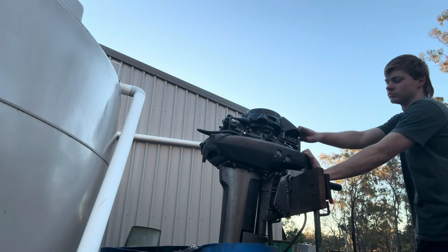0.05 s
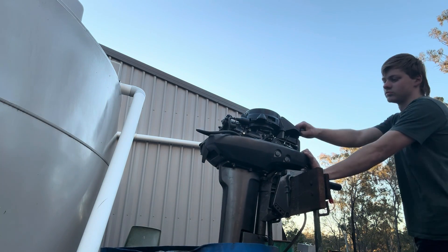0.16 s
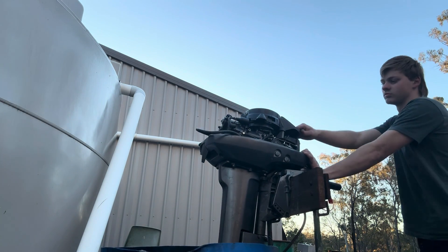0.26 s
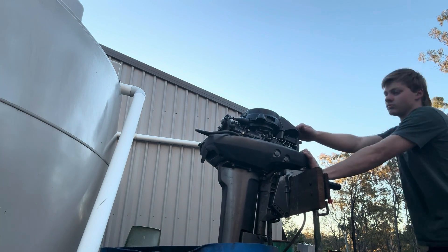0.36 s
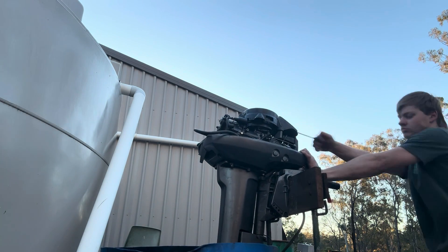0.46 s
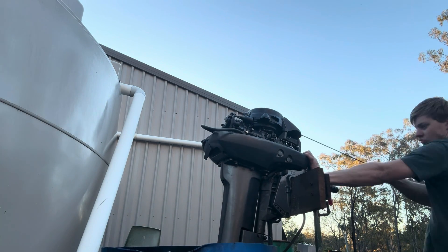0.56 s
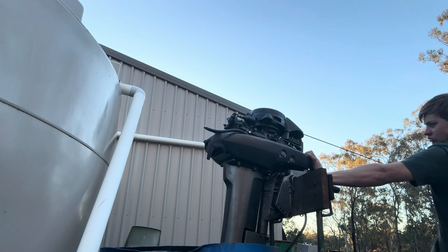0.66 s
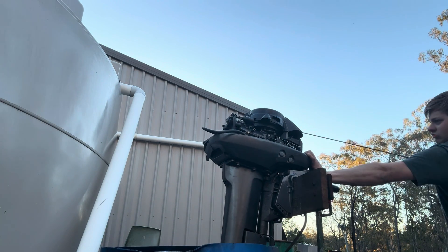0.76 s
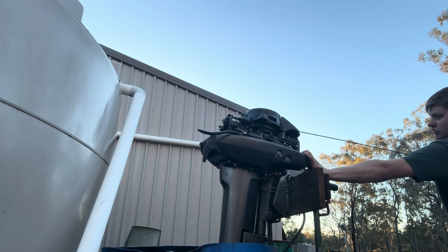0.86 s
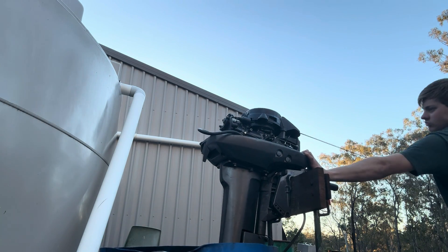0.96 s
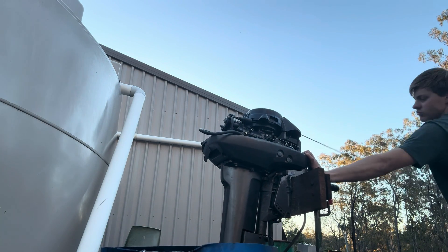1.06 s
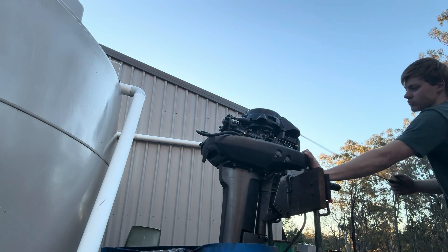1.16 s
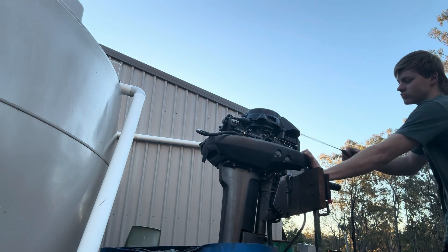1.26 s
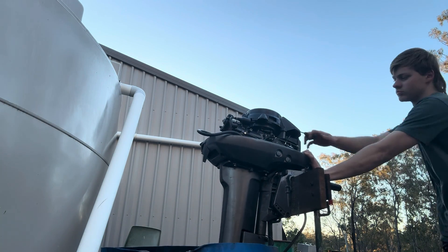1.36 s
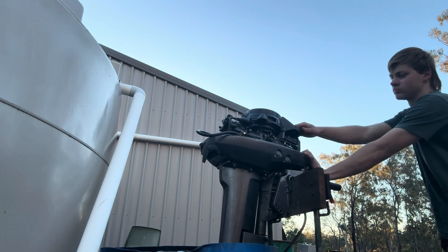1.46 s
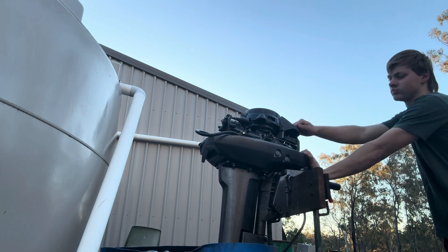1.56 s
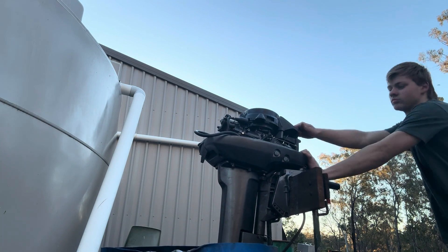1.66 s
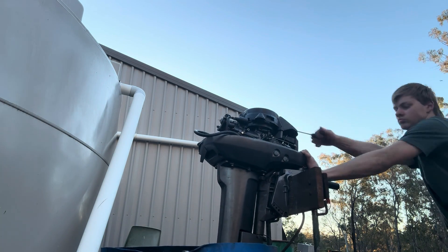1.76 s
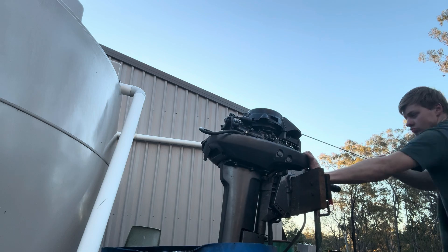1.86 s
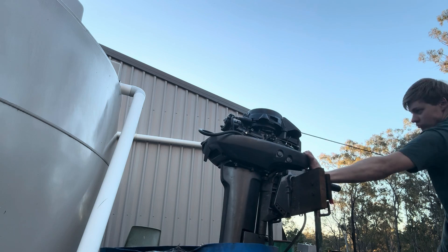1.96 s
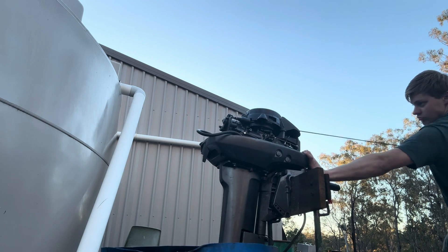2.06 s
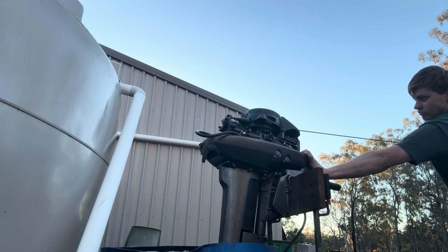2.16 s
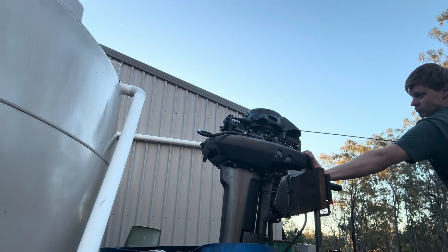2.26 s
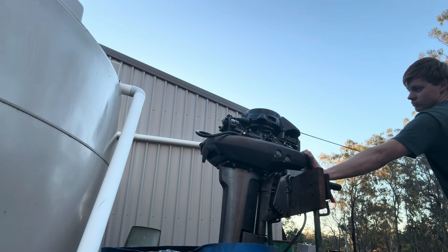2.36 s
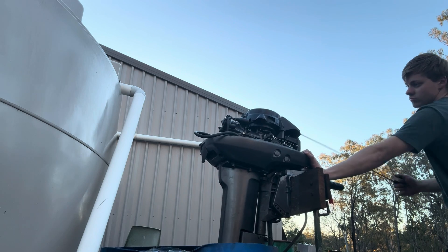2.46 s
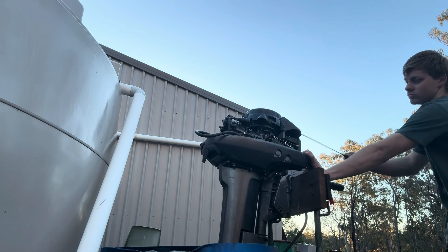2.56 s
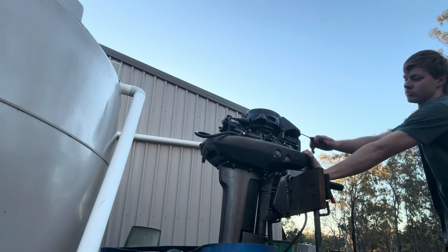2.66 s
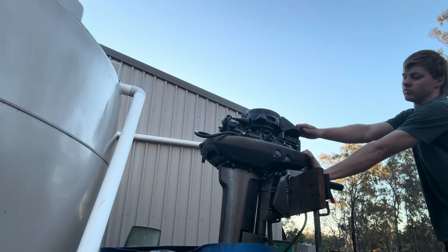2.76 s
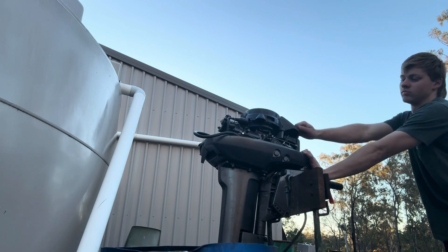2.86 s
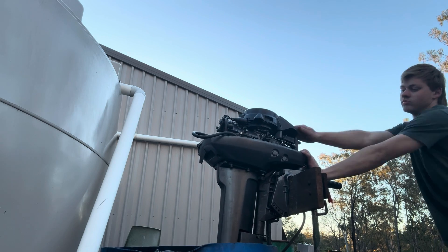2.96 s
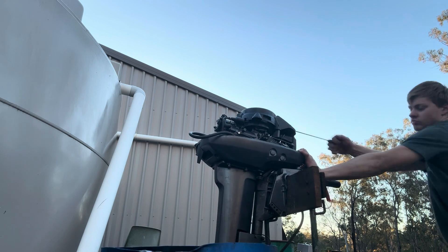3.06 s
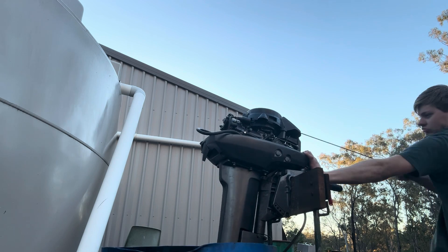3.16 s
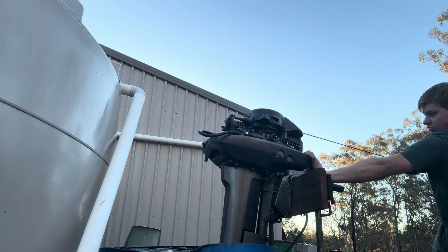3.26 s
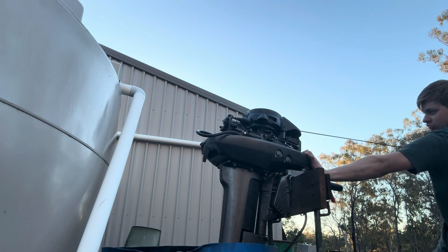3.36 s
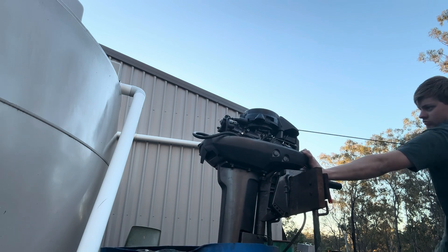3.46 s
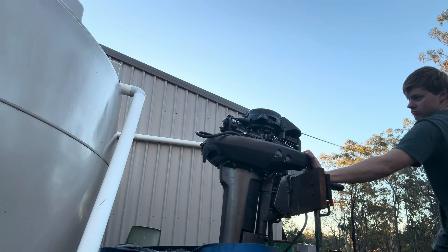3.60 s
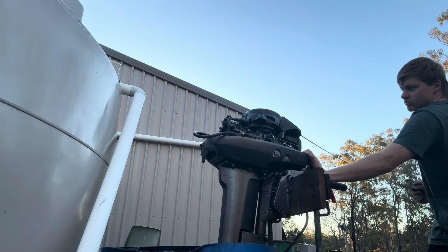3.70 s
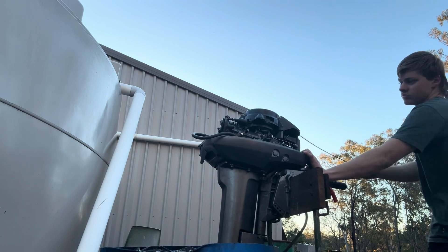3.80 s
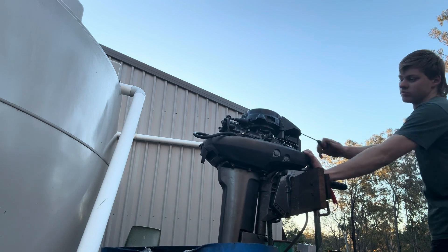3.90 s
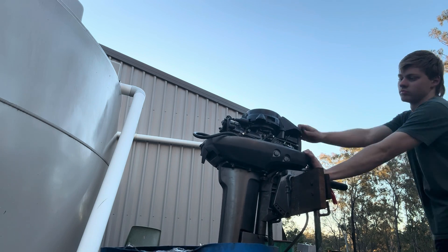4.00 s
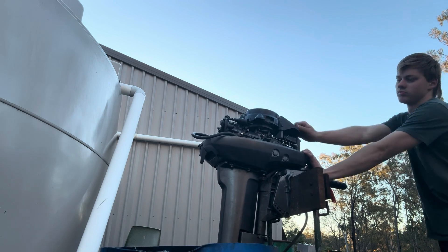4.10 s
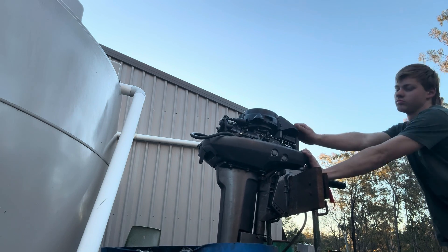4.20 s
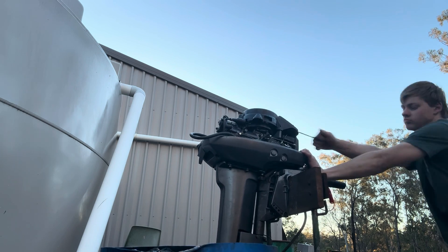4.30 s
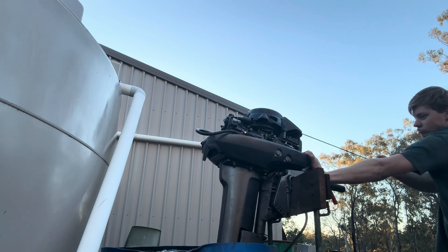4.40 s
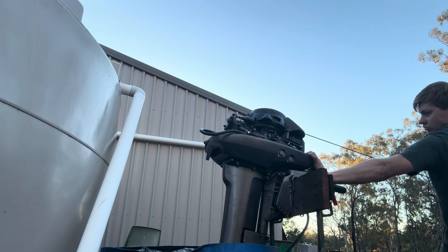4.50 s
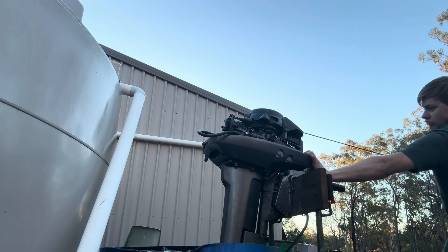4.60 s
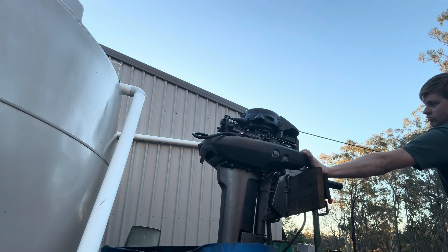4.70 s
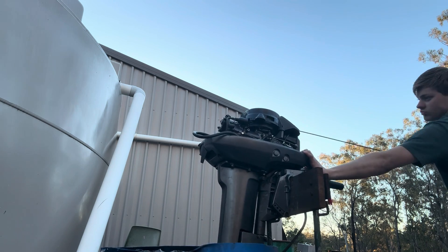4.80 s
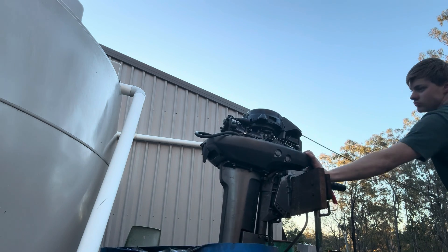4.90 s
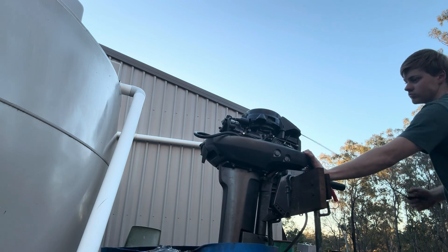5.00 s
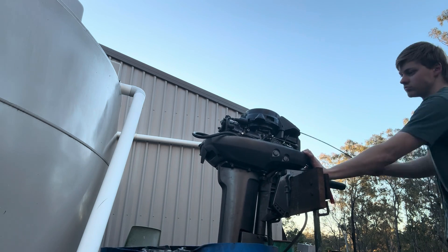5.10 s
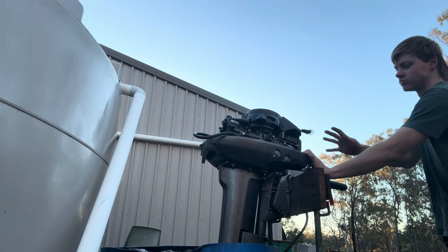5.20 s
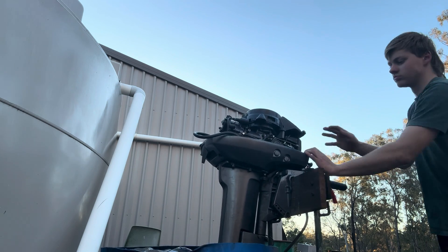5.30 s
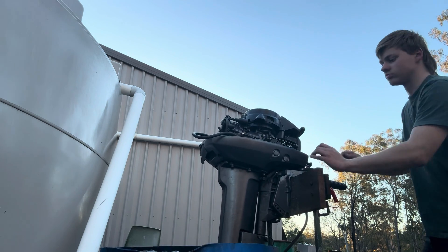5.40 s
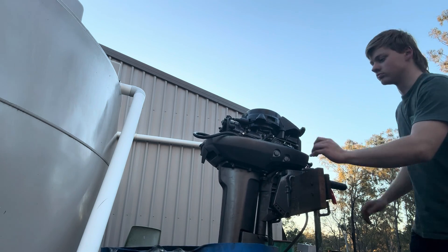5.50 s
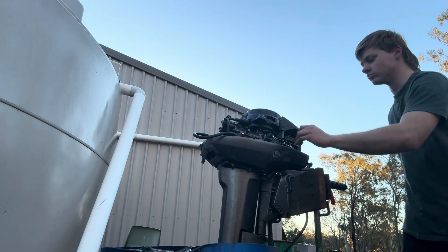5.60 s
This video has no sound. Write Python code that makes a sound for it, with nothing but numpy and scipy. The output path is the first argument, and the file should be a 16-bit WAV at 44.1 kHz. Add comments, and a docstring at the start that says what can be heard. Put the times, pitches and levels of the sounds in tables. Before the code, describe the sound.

An outboard motor is pulled over four times by its starter rope and never fires, heard nearby in a quiet yard with a short echo off a shed wall. The pulls begin at about 0.5, 1.7, 3.1 and 4.3 seconds, each with a small scrape and a sharp clack as the starter bites. The rope whirs out with a brief rising zing and a dense rattle, while the engine turns over in about a dozen rapid, honking pulses with low exhaust thumps and hisses, slowing to a stop after roughly 0.6 seconds. The rope then rattles more softly back onto its pulley. Faint, thin spring squeaks come between pulls, around 0.9 to 1.7, 2.5 to 3 and 4 seconds. Near 4.9 seconds a knock makes the housing hum briefly, and at 5.2 seconds the handle knocks home, followed by a couple of faint clicks.

```python
"""Outboard that will not start

A two-cylinder outboard on a stand in a yard is pulled over four times by its rope and does not catch.
The pawl knocks in; each crank half-turn honks a reed valve, thumps the exhaust leg and hisses at the
ports. The rope whirs out and rattles back onto its pulley, the rewind spring squeaks between pulls,
a shed wall echoes."""
import sys
import numpy as np
from scipy import signal
from scipy.fft import rfft, irfft, next_fast_len
from scipy.io import wavfile
from scipy.ndimage import uniform_filter1d

SR = 44100
rng = np.random.default_rng(int(sys.argv[2]) if len(sys.argv) > 2 else 0)


def inscribe(sig):
    """Save sig as 16-bit PCM at rate SR to the path in sys.argv[1].

    A 1-D sig is mono; a 2-D sig holds one channel per row.
    Samples are clipped to [-1, 1] before scaling.
    """
    pcm = np.round(np.clip(np.atleast_2d(sig).T, -1, 1) * 32767)
    wavfile.write(sys.argv[1], SR, pcm.astype(np.int16))


N = 249165
t = np.arange(N) / SR


def undb(db):
    return 10 ** (np.asarray(db) / 20)


def unit(x):
    return x / np.sqrt(np.mean(x ** 2))


def ring(x, modes):
    """Parallel resonators of alternating sign; modes: f/Hz, width/Hz, gain/dB."""
    return sum((-1) ** k * undb(db) * signal.lfilter(*signal.iirpeak(hz, hz / width, SR), x)
               for k, (hz, width, db) in enumerate(modes))


def colour(spectrum, x=None):
    """White noise, or x, shaped by a spectrum (f/Hz, gain/dB); rms 1."""
    x = rng.standard_normal(N) if x is None else x
    hz, db = np.transpose(spectrum)
    size = next_fast_len(N)
    bin_hz = np.arange(size // 2 + 1) * SR / size
    gain = undb(np.interp(np.log(bin_hz + 1), np.log(hz), db, left=-90))
    return unit(irfft(rfft(x, size) * gain, size)[:N])


def walk(rate_hz):
    """Smoothed random steps; rms 1."""
    hold = max(int(SR / rate_hz), 2)
    steps = np.repeat(rng.standard_normal(N // hold + 1), hold)
    return unit(uniform_filter1d(uniform_filter1d(steps, hold), hold)[:N])


def bumps(at_s, db, rise_s, fall_s, edge=2):
    """Envelope of asymmetric swells; a larger edge flattens the top."""
    out = np.zeros(N)
    for at, gain, rise, fall in np.broadcast(at_s, undb(db), rise_s, fall_s):
        near = slice(max(int((at - 4 * rise) * SR), 0), int((at + 4 * fall) * SR))
        u = t[near] - at
        out[near] += gain * np.exp(-.5 * np.abs(u / np.where(u < 0, rise, fall)) ** edge)
    return out


def tones(rows, waver, flicker_db, rasp):
    """Gliding, wavering, rough sines that swell in and out."""
    out = np.zeros(N)
    for start, end, from_hz, to_hz, db in rows:
        fade = np.sin(np.pi * np.clip((t - start) / (end - start), 0, 1)) ** .5
        pitch_hz = np.interp(t, [start, end], [from_hz, to_hz]) * (1 + waver * walk(90))
        wave = np.sqrt(2) * np.sin(2 * np.pi * np.cumsum(pitch_hz) / SR)
        out += wave * fade * undb(db + flicker_db * walk(40)) * (1 + rasp * walk(300))
    return out


def place(x, pan_db, wall_db, t60_s=.098, left_lag_s=88e-6):
    """Pan (+ is left), left side delayed; shed and tank return a separate short echo to each side."""
    u = np.arange(int(.3 * SR)) / SR
    echo = rng.standard_normal((2, len(u))) * np.exp(-np.log(1000) * u / t60_s) * (u > .003)
    echo = signal.sosfilt(signal.butter(1, [150, 12000], "band", fs=SR, output="sos"), echo)
    echo /= np.sqrt(np.sum(echo ** 2, 1, keepdims=True))
    wet = signal.fftconvolve(x[None], echo, axes=1)[:, :N]
    size = next_fast_len(N)
    bin_hz = np.arange(size // 2 + 1) * SR / size
    late = irfft(rfft(x, size) * np.exp(-2j * np.pi * bin_hz * left_lag_s), size)[:N]
    return np.array([late * undb(pan_db / 2), x * undb(-pan_db / 2)]) + undb(wall_db) * wet


def yard():
    """Faint low outdoor noise, mostly common to both sides."""
    spectrum = [(20, -15.5), (40, 3), (120, 3), (270, -7.5), (700, -10.5), (2500, -14), (5000, -26.5),
                (12000, -27.5), (16000, -48)]  # f/Hz, level/dB
    common = colour(spectrum)
    sides = np.array([colour(spectrum), colour(spectrum)])
    return undb(-68.5) * (common + .33 * sides)


def spring():
    """Thin, intermittent squeak of the rewind spring."""
    squeaks = [(.11, .15, 4220, 4150, -59), (.19, .26, 4280, 4230, -58.5), (.925, 1.01, 3880, 3800, -48),
               (1.12, 1.32, 3810, 3680, -52), (1.36, 1.42, 3700, 3680, -49),
               (1.45, 1.535, 3650, 3480, -51.5), (1.55, 1.615, 3480, 3520, -51),
               (1.635, 1.7, 3590, 3480, -52), (2.5, 2.8, 2880, 2740, -58), (2.845, 2.99, 2800, 2660, -60),
               (3.89, 3.93, 4000, 4000, -55), (3.97, 4.095, 3910, 3925, -44.5),
               (4.2, 4.29, 3940, 3860, -49)]  # start/s, end/s, from/Hz, to/Hz, level/dB
    return tones(squeaks, waver=.004, flicker_db=3, rasp=.35)


def rope():
    """Rope sings over its guide: rising on the pull, falling on the rewind."""
    glides = [(.54, .64, 1200, 1400, -28.5), (1.19, 1.29, 1437, 1300, -46), (1.3, 1.375, 1062, 941, -51),
              (1.8, 1.9, 1055, 1400, -34), (3.17, 3.28, 1230, 1320, -28.5), (3.84, 3.89, 1400, 1330, -48),
              (4.43, 4.525, 1253, 1350, -28), (5.1, 5.16, 1400, 1340, -45)]  # start/s, end/s, from/Hz, to/Hz, level/dB
    return tones(glides, waver=.025, flicker_db=3, rasp=.7)


def housing_hum():
    """The housing hums briefly after one knock."""
    hum = [(4.925, 4.975, 589.5, 568, -20.5)]  # start/s, end/s, from/Hz, to/Hz, level/dB
    return tones(hum, waver=.01, flicker_db=6, rasp=.15)


def pull_gains():
    """Rattle, rumble, whir and air gains: one out-and-back course, stretched to each pull."""
    pulls = [(-.88, .1), (.457, 1.46), (1.716, 2.8), (3.061, 4.07), (4.33, 5.38)]  # pawl bites/s, rope home/s; the first is only a tail
    spin_db = [(-24.5, -24.5, -50, -53.5), (-29, -26, -52, -53.5), (-29.5, -26, -62, -55.5),
               (-29.5, -25.5, -52, -57.5), (-28, -26.5, -52, -57.5)]  # full spin, per pull: rattle/dB, rumble/dB, whir/dB, air/dB
    course = [(-.02, -59.5, -57.5, -17, -32.5), (.04, -4, -14.5, -7.5, -2.5), (.13, -3.5, -3, -4.5, -0.3),
              (0.282, 0.8, 0.3, -4.5, -2.5), (.45, -6.5, -12.5, -8.5, 2.6), (.62, -10.5, -4.5, -7, -8.5),
              (.72, -8.5, -11, -6, -29), (.85, -17.5, -20.5, -11, -30), (.96, -22, -25.5, -1, -24.5),
              (1.03, -40.5, -39.5, -13.5, -25.5), (1.3, -56.5, -52, -20.5, -32)]  # share of pull, then re full spin: rattle/dB, rumble/dB, whir/dB, air/dB
    share, *course_db = np.transpose(course)
    gains = np.zeros((4, N))
    for (bite_s, home_s), full_db in zip(pulls, spin_db):
        progress = (t - bite_s) / (home_s - bite_s)
        for gain, full, db in zip(gains, full_db, course_db):
            gain += undb(full + np.interp(progress, share, db, left=-99, right=-99))
    return gains


def pulley():
    """Dense uneven ticks of rope, spring and pawl ring the housing; rope whir and flywheel air above."""
    modes = [(451.4, 28, 16), (624, 86, 12.5), (961, 110, 18), (1303, 64, 11.5), (1490, 20, -2.5),
             (1706, 100, 0.5), (2060, 27, -29.5), (2630, 30, -28), (3420, 570, -14)]  # housing: f/Hz, width/Hz, gain/dB
    scrapes = [(0.411, 0.46, -40.5), (1.684, 1.694, -53), (3.011, 3.06, -37.5), (4.289, 4.327, -36)]  # slack taken up, pawl scraping out: start/s, end/s, level/dB
    whir_spectrum = [(1800, -2), (2500, -7), (3500, -7.5), (5000, -10), (7000, -16.5), (9000, -43.5)]  # rope: f/Hz, level/dB
    air_spectrum = [(5000, -12.5), (7000, -34.5), (10000, -5.5), (14000, 13), (15500, -7), (16500, -26)]  # flywheel: f/Hz, level/dB
    rattle, rumble, whirring, wind = pull_gains()
    start, end, slack_db = np.transpose(scrapes)
    half_s = (end - start) / 2
    slack = bumps(start + half_s, slack_db, half_s, half_s, edge=2.7)
    ticks = rng.standard_normal(N) * undb(np.minimum(3 * rng.exponential(size=N), 17))

    def flicker(db):
        return undb(db * walk(70))

    shaken = ticks * flicker(2.2)
    # the contact wanders over the housing, so each mode also flickers alone
    upper = unit(sum(ring(shaken * flicker(3.4), [mode]) for mode in [*modes[2:], (1400, 1500, -22)]))
    lower = unit(sum(ring(shaken * flicker(3.64), [mode]) for mode in [(300, 80, -4), *modes[:2]]))
    whir = colour(whir_spectrum, shaken) * flicker(.83)
    air = colour(air_spectrum, ticks) * flicker(2)
    housing = upper * (rattle + slack) + lower * (rumble + 1.2 * slack)
    return housing + whir * (whirring + .5 * slack) + air * wind


def knocks(bounce_s=.011, push_s=.0011):
    """Pawl, handle and housing knocks: a blow, a bounce and a buzz ring the housing; a crack on top."""
    hits = [(0.041, -31.5, -34, -40, 0.48), (0.414, -24, -38, -20, 1), (0.457, -1.5, -13, -10.5, 0.45),
            (0.778, -10, -18.5, -42.5, 0.55), (1.692, -32, -48.5, -34, 0.68),
            (1.716, -3.5, -11.5, -11, 0.23), (2.767, -37, -40, -67.5, 0.96), (2.781, -41, -48, -68.5, 1),
            (3.008, -33, -53.5, -29, 0.93), (3.061, -3, -14, -11, 0.54), (4.009, -27.5, -36, -55.5, 0.54),
            (4.083, -38, -67, -70, 0.3), (4.187, -39.5, -50, -49, 0.86), (4.286, -24, -39, -25, .6),
            (4.33, -2.5, -14, -10.5, 0.81), (4.916, -16.5, -17, -23.5, 1), (5.235, -7.5, -13, -15.5, 1),
            (5.286, -19, -28, -41, 1), (5.423, -41, -47, -40.5, 0.59), (5.532, -61, -56.5, -31.5, 0.32)]  # t/s, high ring/dB, low ring/dB, crack/dB, decay scale
    low_modes = [(310, 80, -2), (465, 80, -3), (615, 120, 0)]  # housing: f/Hz, width/Hz, gain/dB
    high_modes = [(960, 100, -7), (1300, 170, 0), (1830, 120, -12), (2330, 150, -22)]  # housing: f/Hz, width/Hz, gain/dB
    at_s, high_db, low_db, crack_db, decay = np.transpose(hits)

    def buzz(db, tail_db, bounce_db):
        push = bumps(at_s + .0024, db, push_s, push_s * decay)
        bounce = bumps(at_s + bounce_s, db + bounce_db, push_s, 2 * push_s)
        tail = bumps(at_s + .0013, db + tail_db, .0047, .016 * decay)
        return rng.standard_normal(N) * (push + bounce + tail)

    def blow(db, lag_s):
        out = np.zeros(N)
        out[((at_s + lag_s) * SR).astype(int)] = undb(db)
        return out

    high = ring(blow(high_db + 35, .0025) + buzz(high_db + 6, -10.5, -18), high_modes)
    low = ring(blow(low_db + 39.5, .004) + buzz(low_db + 15.5, -10.5, 0), low_modes)
    snap = buzz(crack_db, -20, -27.5)
    ping = ring(snap, [(2800, 47, 14.3), (3450, 49, 9.3)])  # steel of the pawl
    crack = colour([(2000, 0), (2600, -4.5), (4500, 2), (6500, -3), (9000, -14.5), (14000, -12.5),
                    (16500, -12.5)], snap + ping)
    return high + low + crack * undb(-39.5)


def strokes():
    """Half-turn columns, cylinder, duration/s. Cylinder indexes setting pairs: 0 stiff reed, 1 soft."""
    # crank half-turns per pull: t/s, reed f/Hz, reed octave/dB, puff/dB, port lag/ms, hiss/dB, chirp/dB
    pulls = [
        [(.505, 357, -43.5, -40, -0.5, -29.5, -56), (.561, 329.6, -16.5, -32.5, 7, -49, -58),
         (.611, 357, -23.5, -23.5, -7.5, -25.5, -44.5), (.652, 328, -11.5, -32, -3.5, -44, -49),
         (.689, 355.5, -20, -22.5, -10, -25, -47.5), (.725, 324, -10, -45.5, 0, -41, -62),
         (.757, 338, -19, -21.5, -0.5, -26, -43), (.804, 328.2, -11, -33.5, -8, -29.5, -43),
         (.845, 357, -21, -24, -5.5, -24, -45), (.893, 326, -11.5, -46.5, 18.5, -46, -59.5),
         (.948, 358, -20, -22, -3.5, -27, -39.5), (1.01, 339, -14, -41.5, 15, -47.5, -61),
         (1.088, 359.5, -22, -25, 9.5, -38, -60)],
        [(1.812, 364.6, -23, -28, 1.5, -27, -42.5), (1.864, 327, -16.5, -38, 2, -57, -59),
         (1.91, 362, -20.5, -21.5, -6.5, -26.5, -34), (1.949, 331, -13, -46.5, 1, -51, -59),
         (1.99, 358, -21.5, -23, -8.5, -26.5, -30.5), (2.026, 326, -13.5, -45.5, 1.5, -55.5, -60),
         (2.061, 353, -18, -21.5, -4, -25, -30.5), (2.106, 326, -15, -34.5, -4, -43, -52.5),
         (2.151, 356.8, -20.5, -21.5, -5.5, -25.5, -37), (2.199, 327, -13, -48, 25, -40.5, -73),
         (2.256, 361, -21.5, -23.5, 5, -29.5, -53.5), (2.324, 346.5, -18, -38, 2, -56.5, -64.5),
         (2.407, 358, -23, -27.5, -5, -45.5, -61)],
        [(3.144, 360.4, -22, -25.5, -1, -28.5, -43), (3.193, 326, -15.5, -38.5, -1, -55, -58.5),
         (3.249, 354.5, -24.5, -23, -10.5, -27, -50.5), (3.283, 329.4, -10.5, -35.5, 2, -45.5, -52),
         (3.321, 351, -19.5, -22.5, 1.5, -25, -37.5), (3.364, 331.3, -12.5, -36, 1.5, -41.5, -51),
         (3.409, 354, -19, -22.5, -3.5, -25, -49), (3.457, 333, -13, -32.5, 5, -54, -48),
         (3.511, 358.7, -20, -23.5, -6.5, -30, -44.5), (3.568, 342, -17, -44, -3, -54, -67),
         (3.646, 362, -20, -25.5, -13.5, -38, -44)],
        [(4.411, 358.7, -21.5, -26, 1.5, -34, -52), (4.462, 328.6, -16.5, -35.5, .1, -55, -57),
         (4.51, 363.6, -22, -24.5, -6, -26, -43), (4.543, 330, -14, -38.5, 6, -47, -52.5),
         (4.585, 345, -23, -24, -3.7, -30.5, -52), (4.629, 329.5, -14, -36, -4, -46.5, -55),
         (4.669, 356, -20.5, -22, -2, -28, -36), (4.713, 329, -13.5, -43, 1, -39.5, -47),
         (4.765, 355, -20, -22.5, -11, -31.5, -47), (4.819, 331.5, -15, -39, .1, -52, -65),
         (4.884, 359, -21, -24.5, -7, -36, -41), (4.986, 354, -24.5, -42, .1, -62, -65)],
    ]
    cylinder = np.concatenate([np.arange(len(pull)) % 2 for pull in pulls])
    turn_s = np.concatenate([np.gradient(np.array(pull)[:, 0]) for pull in pulls])
    return (*np.concatenate(pulls).T, cylinder, turn_s)


def ports(hiss_share=(.14, .2), spit_length_s=.0055):
    """A port opens with a spit of air; the hiss peaks just after and chirps at the port edge."""
    spits = [(.958, -35), (1.078, -41), (1.214, -51), (1.35, -54), (3.109, -39), (3.807, -39.5),
             (4.386, -36), (4.63, -53), (5.09, -40.5)]  # extra lone spits: t/s, level/dB
    hiss_spectrum = [(1470, -34.5), (2500, -13), (3020, -24.5), (5330, 6.5), (7370, -29), (10400, -4),
                     (12000, -9.5), (13800, 3.5), (15500, -3), (16500, -31)]  # f/Hz, level/dB
    stroke_s, _, _, _, lag_ms, hiss_db, edge_db, cylinder, turn_s = strokes()
    spit_s, spit_db = np.transpose(spits)
    at_s = np.r_[stroke_s + lag_ms / 1000, spit_s]
    air_db = np.r_[hiss_db, spit_db]
    chirp_db = np.r_[edge_db, spit_db - 16.5]
    length_s = np.r_[np.take(hiss_share, cylinder) * turn_s, np.full(len(spits), spit_length_s)]
    gust = undb(2 * walk(400))
    hiss = colour(hiss_spectrum) * bumps(at_s, air_db, .3 * length_s, .5 * length_s)
    spit = colour([(1500, -8.5), (3000, -1.5), (6000, -.5), (9000, -.5), (14000, -8), (16500, -29.5)])
    spit *= bumps(at_s - .008, air_db - 3.5, .0004, .0024)
    edge = ring(ring(rng.standard_normal(N), [(5900, 710, 0)]), [(5300, 550, 0)])
    chirp = unit(edge) * bumps(at_s + .002, chirp_db + 5, .003, .004)
    return (hiss + spit) * gust + chirp


def exhaust(puff_hz=(108, 82), lag_share=(.14, .21), rise_s=.0059, fall_s=.0048, sag_per_s=4.8):
    """A puff rings the long leg, its pitch sagging; turbulence shakes it and rumbles after."""
    puffs, shake_rad = np.zeros(N), .3 * walk(70)
    stroke_s, _, _, puff_db, *_, cylinder, turn_s = strokes()
    at_s = stroke_s + np.take(lag_share, cylinder) * turn_s
    for at, db, hz in zip(at_s, puff_db, np.take(puff_hz, cylinder)):
        near = slice(int((at - .05) * SR), int((at + .05) * SR))
        u = t[near] - at
        swell = np.exp(-.5 * (u / np.where(u < 0, rise_s, fall_s)) ** 2)
        phase = 2 * np.pi * hz * (u - sag_per_s * u ** 2) + shake_rad[near]
        puffs[near] += 2 * undb(db) * swell * np.cos(phase)
    rumble = colour([(20, -35), (40, -12.5), (80, 1.5), (140, -6), (200, -9.5), (280, -13), (400, -58.5)])
    return puffs + rumble * bumps(at_s, puff_db - 9, .0043, .043)


def reeds(flutter_share=(.71, .43), longest_s=(.039, .06), glide=.0415, rise_share=.52, fall_share=.41):
    """Each half-turn sets a reed valve fluttering; the stiffer reed slides up, slaps and rasps."""
    out, wobble, rasp = np.zeros(N), walk(120), walk(260)
    at_s, flutter_hz, octave_db, *_, cylinder, turn_s = strokes()
    length_s = np.minimum(np.take(flutter_share, cylinder) * turn_s, np.take(longest_s, cylinder))
    # a slower turn swings the reed wider
    slower_ms = 1000 * (turn_s - turn_s.mean())
    swing_db = np.take((.0754, .1421), cylinder) * slower_ms
    fundamental_db = octave_db + np.take((-1.1, -7.5), cylinder) + swing_db
    for at, length, hz, low_db, high_db in zip(at_s, length_s, flutter_hz, fundamental_db, octave_db):
        near = slice(int((at - .1) * SR), int((at + .1) * SR))
        u = t[near] - at
        stiff = np.clip((hz - 335) / 15, 0, 1)
        rough = .07 + .35 * stiff
        pitch_hz = hz * (1 + stiff * glide * np.tanh(2 * u / length) + .0774 * rough * wobble[near])
        phase = 2 * np.pi * (np.cumsum(pitch_hz) / SR + rng.random())
        slap = undb(-31 + 10 * stiff) * (np.sin(3 * phase) + np.sin(4 * phase)) * (1 + rasp[near])
        wave = undb(low_db) * np.sin(phase) + undb(high_db) * (np.sin(2 * phase) + slap)
        width_s = length * np.where(u < 0, rise_share, fall_share)
        swell = np.exp(-.5 * np.abs(u / width_s) ** 3.2)
        out[near] += np.sqrt(2) * wave * (1 + rough * np.tanh(rasp[near])) * swell
    return out


def scene():
    """Engine, starter and yard in stereo."""
    whines = rope() + spring()
    engine = place(reeds(), pan_db=5.35, wall_db=-10)
    engine += place(exhaust(), pan_db=.6, wall_db=-14.5)
    engine += place(ports(), pan_db=.12, wall_db=-11)
    starter = place(knocks(), pan_db=-4.3, wall_db=-8.5)
    starter += place(pulley(), pan_db=-.29, wall_db=-9.5)
    starter += place(housing_hum(), pan_db=2.5, wall_db=-11)
    starter += place(whines, pan_db=-.5, wall_db=-22)
    return engine + starter + yard()


def record(dry, top_hz=16300):
    """Soft clip, then steep low-pass."""
    return signal.sosfilt(signal.ellip(10, .2, 95, top_hz, fs=SR, output="sos"), np.tanh(dry))


dry = scene()
out = record(dry)
inscribe(out)
```